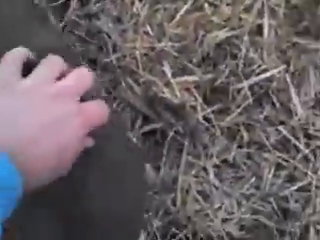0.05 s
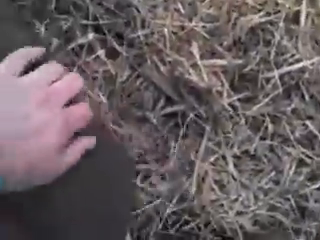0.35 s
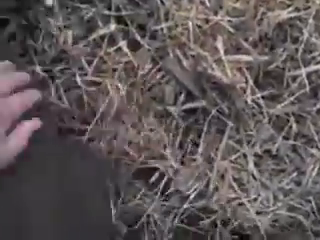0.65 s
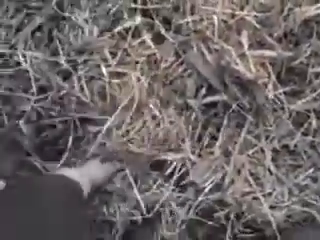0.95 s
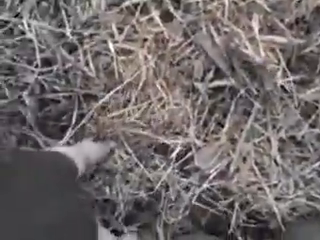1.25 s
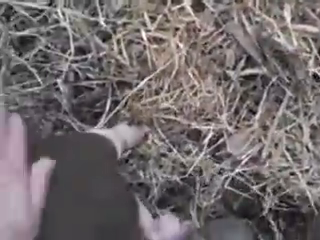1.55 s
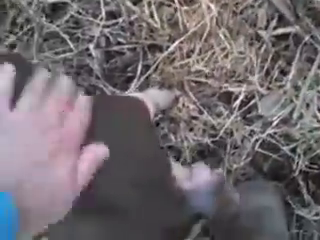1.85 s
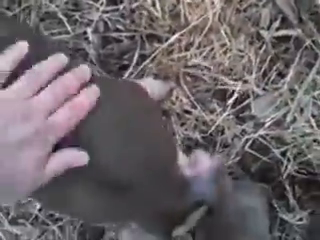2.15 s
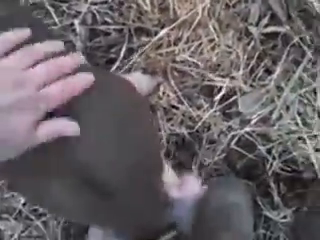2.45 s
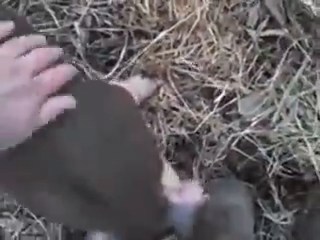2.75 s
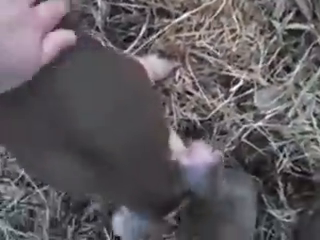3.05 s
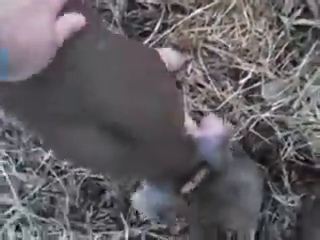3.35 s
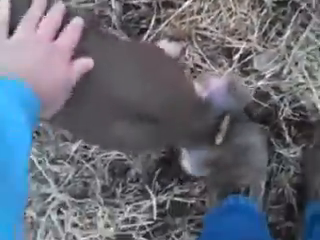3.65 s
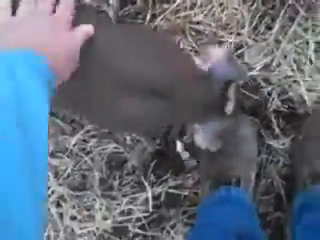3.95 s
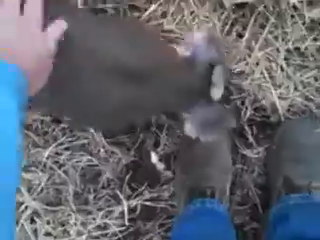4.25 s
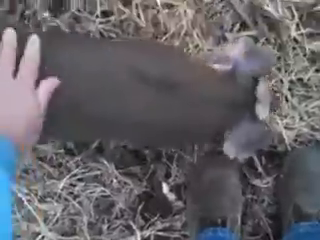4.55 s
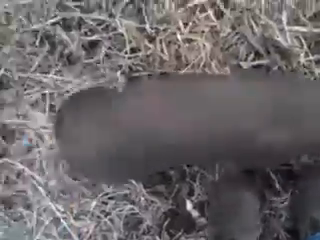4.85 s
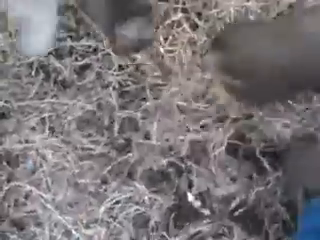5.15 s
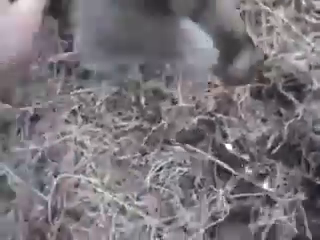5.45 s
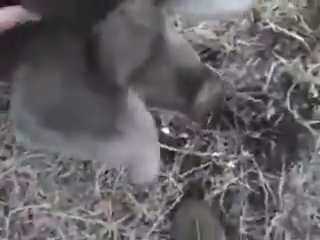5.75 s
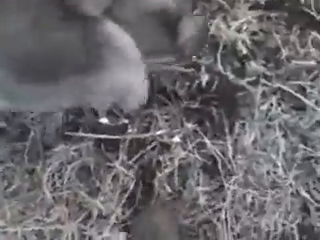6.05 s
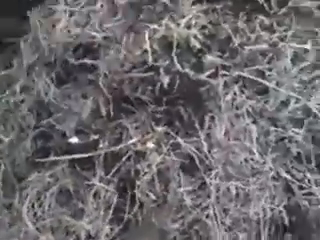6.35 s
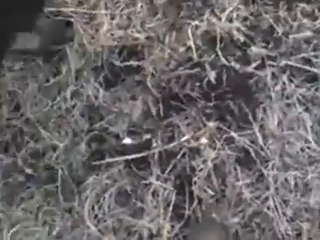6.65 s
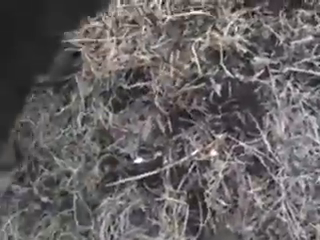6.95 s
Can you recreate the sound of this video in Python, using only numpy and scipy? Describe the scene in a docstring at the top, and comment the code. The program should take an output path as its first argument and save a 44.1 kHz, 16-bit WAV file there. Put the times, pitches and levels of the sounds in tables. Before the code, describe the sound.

A young pig is heard up close outdoors, over a steady hiss and a faint rumble of breeze. Throughout, dry straw rustles and crackles, and a palm drags over bristles with a dull, uneven hiss. Short, low, rattling grunts come at about 0.2, 0.7, 1.1 and 1.5 seconds, with a soft snort and grunt around 2. A louder snort, breaking into separate pops, comes at 3.3 seconds, followed by a grunt and a brief nasal whine. Another loud snort at 4.5 leads into grunts and thin fluttering whines until 5.2. The longest, loudest run of snorts and grunts lasts from 5.8 to 6.5, and a last grunt follows at 6.9. Stalks snap sharply near 1.8, 4.2 and 5.1 seconds. Dull bumps touch the microphone around 2.5, between 3.6 and 4, and at 6.7.

```python
"""Stroking a pig in straw

A young pig stands close to the microphone, outdoors. Slow throat pulses ring its chest and snout in
low rattling grunts, it whines briefly with its mouth shut, and its soft palate slaps open in a few
loud snorts that break into separate pops. A palm drags over bristles while dry stalks rub and snap,
over a steady hiss, a faint rumble of breeze and a few dull bumps on the microphone."""
import sys
import numpy as np
from scipy import signal
from scipy.fft import rfft, irfft, next_fast_len
from scipy.io import wavfile

SR = 44100
rng = np.random.default_rng(int(sys.argv[2]) if len(sys.argv) > 2 else 0)


def transcribe(signal):
    """Save signal, clipped to [-1, 1], as a 16-bit WAV file at the path in sys.argv[1]."""
    frames = np.atleast_2d(signal).T
    limited = np.clip(frames, -1, 1)
    pcm = np.round(limited * 32767).astype(np.int16)
    wavfile.write(sys.argv[1], SR, pcm)


N = 313110
SIDES = np.array([[.5], [-.5]])  # splits a pan or a phase lead between left and right

# Levels in the tables are relative: the layers add their own trims. Positive pan is to the left.
# tone of each noise layer: (frequency [Hz], gain [dB])
BREEZE_EQ = [(20, -52), (45, -29), (70, -5.5), (130, -22), (250, -1), (600, -6), (2000, -58)]
HISS_EQ = [(100, 21), (500, -21), (1200, -3), (2200, -74), (3200, 18), (4500, 1), (8000, -5), (11000, -14),
           (12700, -1), (14000, -13)]
BRISTLE_EQ = [(200, 16.5), (700, 2), (1500, 4.5), (2300, 8.5), (3500, 5.5), (5000, -12.5), (9000, -6)]
STRAW_EQ = [(100, 13), (400, 2.5), (1200, 2), (2200, -0.5), (3200, 5.5), (4500, 7.5), (7000, 8),
            (10000, 6.5), (11500, 9), (12700, 9.5), (14000, -16)]
SNAP_EQ = [(200, -3), (1500, -4), (4000, -2), (9000, -2), (11000, -1), (12500, 2)]
# bleed of each channel into the other: (frequency [Hz], gain [dB])
CROSSFEED_EQ = [(60, -2), (400, -6), (1000, -.5), (2750, 0), (4300, -.4), (5500, -2.5), (8000, -7),
                (12500, -7.5)]
# dull knocks on the microphone: (time [s], level [dB])
MIC_BUMPS = [(2.428, -39), (2.54, -37), (3.09, -58), (3.59, -36), (3.71, -42), (3.98, -32.5), (4.12, -48),
             (6.68, -42)]
# the palm sliding over bristles: (time [s], level [dB])
STROKE_LEVELS = [(0.0, -39.5), (0.57, -41.5), (0.75, -39.5), (1.18, -45), (1.58, -38), (1.8, -49),
                 (2.14, -45.5), (3.28, -42.5), (3.66, -43), (4.15, -42), (4.35, -50), (4.6, -42.5),
                 (5.12, -38), (5.22, -48), (5.85, -51), (6.09, -37), (6.5, -46.5), (6.7, -70)]
# rubs and steps in the straw: (start [s], peak [s], end [s], level [dB])
# with its peak outside its span a rub only builds or only eases; one ending before its start is silent
STRAW_RUBS = [(0, -0.5, 0.09, -38.5), (0.105, -0.5, 0.23, -37.5), (0.261, 0, 0.56, -42),
              (0.433, 0.7, 0.71, -39), (0.606, 2, 0.78, -36), (0.788, 4, 0.9, -37), (0.88, 9, 1.02, -42),
              (1.08, 0.2, 1.33, -40.5), (1.284, -1.5, 1.44, -38), (1.37, 8, 1.72, -42),
              (1.58, -0.4, 1.7, -38.5), (2.02, 1, 2.8, -51.5), (2.448, 4, 2.82, -44.5),
              (2.668, 1, 2.82, -44.5), (2.96, 5, 3.22, -45.5), (3.215, 2, 3.63, -42.5),
              (3.363, 2.5, 3.5, -38.5), (3.443, 2.5, 3.56, -40.5), (3.697, 2, 4.25, -43),
              (3.855, 3.5, 4.15, -40.5), (4.123, 1, 4.24, -37), (4.412, 5, 4.56, -45.5),
              (4.6, 4, 4.83, -42), (4.816, 8.5, 5.1, -42), (5.062, 2, 5.19, -35.5), (5.337, 4, 5.52, -41),
              (5.586, 11, 6.3, -48), (6.032, 6.5, 6.2, -41), (6.204, -2, 6.6, -43.5), (6.553, 5, 7, -44.5),
              (6.67, 7, 6.8, -42.5), (6.83, 8.5, 6.88, -36), (6.975, 6.995, 5.2, -42), (7.071, 6, 7, -47)]
# breaking stalks: (time [s], level [dB], decay [s], ring [Hz])
STALK_SNAPS = [(0.2152, -25, .0012, 12500), (0.229, -22, .0014, 11700), (0.245, -25, .001, 12100),
               (0.623, -27, .002, 6500), (0.654, -22.5, .004, 4200), (0.712, -21.5, .002, 12400),
               (0.761, -21, .0028, 7400), (0.813, -22, .002, 12100), (0.852, -22, .007, 6300),
               (0.9952, -20.5, .001, 12500), (1.363, -27, .0014, 12200), (1.7533, -14.5, .0014, 8100),
               (1.7738, -25, .0009, 11100), (1.8674, -29, .001, 8200), (2.5, -28, .0012, 6700),
               (3.394, -26, .003, 3300), (3.5165, -24.5, .0014, 7800), (3.711, -29, .001, 7000),
               (3.7205, -24.5, .0014, 7000), (4.233, -14.5, .0024, 8300), (4.5583, -20.5, .0018, 3500),
               (5.1377, -11.5, .0012, 12100), (5.407, -24, .0012, 12500), (6.034, -28, .002, 7000),
               (6.298, -27.5, .0014, 7300), (6.388, -20, .0012, 8900), (6.664, -30, .003, 9500),
               (6.6717, -21.5, .0012, 7800), (6.706, -24.5, .0014, 12300), (6.7522, -23.5, .003, 7900),
               (6.823, -25, .0016, 7100), (6.9097, -21, .0016, 12300), (6.9895, -27.5, .003, 11800),
               (7.0007, -24, .0014, 5200), (7.0325, -33, .002, 7300)]
# the pig's resonances, dark to bright; bite and edge are the hard, raspy top of its voice:
# (frequency [Hz], width [Hz], gain [dB], pan [dB], left phase lead [rad])
CHEST_MODES = [(139, 71, 2, 7, 0.067), (222, 94, -1, 0, 0.097)]
NOSE_MODES = [(317, 45, -2, 1, 0.77), (416, 140, 16.5, 6.1, 0.49), (605, 160, 0, 7, 0.32),
              (750, 51, 2.5, 1.8, .1)]
THROAT_MODES = [(1025, 75, 0, 1.5, 0)]
MOUTH_MODES = [(1420, 220, -7, 0, 0.079), (1815, 81, 4.5, -3, 1.33)]
BITE_MODES = [(2430, 170, 1, 0, 2.2), (2730, 140, 0, 0, 3.14)]
EDGE_MODES = [(3370, 175, 12, -2.5, 1.5), (4180, 270, -11, 14, 1)]
# closed-mouth whines: (start [s], length [s], first pitch [Hz], last pitch [Hz], level [dB],
# flutter [0-1])
WHINE_CUES = [(0.04, 0.013, 910, 970, -37.5, 0.2), (0.84, 0.018, 935, 1190, -35, 0.1),
              (0.827, 0.04, 357, 330, -39.5, 0), (1.343, 0.012, 541, 486, -27.5, 0),
              (1.351, 0.025, 443, 387, -35.5, 0), (1.531, 0.016, 467, 511, -31, 0),
              (1.544, 0.019, 525, 538, -28, 0), (1.571, 0.0097, 524, 502, -31, 0),
              (3.577, 0.043, 391, 328, -34.5, 0.1), (3.764, 0.11, 376, 271, -39, 0.12),
              (4.27, 0.026, 293, 320, -39.5, 0.33), (4.481, 0.06, 452, 380, -34, 0.2),
              (4.537, 0.022, 407, 370, -26, 0), (4.559, 0.032, 349, 330, -33.5, 0.1),
              (4.898, 0.043, 348, 357, -34, 0.2), (4.926, 0.14, 391, 316, -37, 0.6),
              (5.068, 0.084, 316, 287, -38.5, 0.3), (5.102, 0.1, 381, 329, -40.5, 0.82),
              (6.438, 0.11, 350.4, 336, -40, 0.46), (6.963, 0.056, 325, 340, -45, 0.36),
              (6.985, 0.13, 335.5, 319, -50, 0.2)]
# grunts: (start [s], peak [s], end [s], nose [dB], chest [dB], mouth [dB], bite [dB], pulse rate [Hz],
# breathiness [0-1], upper mouth modes [dB], nose tuning [ratio], mouth tuning [ratio])
GRUNT_CUES = [(0.15, 0.182, 0.29, -37, -49, -67, -60, 55, 0.5, 8, 0.79, 0.71),
              (0.622, 0.674, 0.784, -36, -32, -42.5, -45, 67, 0.17, -9, 0.94, 1.08),
              (0.746, 0.78, 0.875, -40, -36, -40, -36, 65, 0.3, -6, .95, 1.08),
              (1.058, 1.136, 1.29, -43, -43.5, -42.5, -52, 56, 0.53, -6.5, 0.86, 1.06),
              (1.527, 1.547, 1.625, -46, -34, -48, -60, 49, 0.27, -15, 0.96, 1.02),
              (1.9, 2.02, 2.12, -42, -42, -46, -54, 32, 0.9, -8, 0.97, 0.93),
              (2.091, 2.143, 2.2, -34, -37, -42.5, -65, 80, 0.49, -26, 1.05, 1.13),
              (3.42, 3.514, 3.56, -43, -44, -42.5, -54, 62, 0.6, -9, 1.1, 1.01),
              (4.461, 4.514, 4.575, -31.5, -39, -38, -48, 31.5, 0.9, -4, 1.03, 1.02),
              (4.59, 4.718, 4.78, -35, -53, -41, -47, 82, 0.74, -11, 1.016, 0.95),
              (4.745, 4.773, 4.845, -33, -36.5, -39.5, -55, 74, 0.73, -15, 0.99, 0.94),
              (4.93, 5.007, 5.065, -43.5, -42, -59, -60, 58, 0.1, -5, 0.81, 1),
              (5.786, 5.827, 5.98, -36, -42, -39.5, -49, 33, 0.7, -3, 1.11, 1.02),
              (5.96, 6.057, 6.1, -38.5, -49, -44, -50, 36, 0.98, -1, 1.15, 1.1),
              (6.055, 6.118, 6.186, -38, -41, -27.5, -33.5, 52.4, 0.3, 2.5, 1.1, 1.02),
              (6.19, 6.28, 6.33, -35.5, -56, -45.5, -60, 60, 0.7, -19, 0.75, 0.82),
              (6.37, 6.46, 6.56, -41.5, -39, -48, -62, 57, 0.42, -17, 0.98, 0.89),
              (6.86, 6.9, 6.955, -34.5, -32.5, -42, -67, 76, 0.54, -10, 0.99, 1.01)]
# pops of the snorts: (time [s], level [dB], mouth over nose [dB], rasp [dB], mouth tuning [Hz])
SNORT_POPS = [(0.110, -39, -11, -18, 1840), (0.314, -50, -19, -6, 1900), (0.336, -43.5, -5, -3, 1960),
              (0.532, -39, -3, -15, 1880), (0.639, -41.5, 7, 0, 2010), (0.654, -43, 6, 6, 2000),
              (0.669, -37.5, -9, -3, 2000), (1.574, -48, -24, 0, 1850), (1.597, -44, -17, -4, 1870),
              (1.957, -43.5, -5, 5.5, 1840), (1.9897, -40.5, -8, 2.5, 1740), (2.025, -47.5, -8, 8, 1800),
              (2.058, -45, -1.5, 6.5, 1700), (2.091, -47.5, -1, 3, 1700), (3.284, -42, 5, -7, 1780),
              (3.31, -28.5, 10.5, 5, 1755), (3.345, -30.5, 8.5, -1.5, 1683), (3.38, -35.5, 3.5, -2, 1730),
              (3.393, -45.5, -9, 10, 1730), (4.439, -34.5, 6.5, -4.5, 1794), (4.464, -29.5, 4, -17, 1800),
              (4.494, -27.5, -1, -7.5, 1794), (4.526, -28.5, -4, -2.5, 1674), (4.558, -27.5, -4.5, 3, 1644),
              (5.787, -33.5, -5, -7, 1780), (5.812, -27.5, -4, -13, 1800), (5.85, -25.5, -7, -5, 1550),
              (5.879, -25, -0.5, 4.5, 1590), (5.907, -29.5, -8, -4.5, 1610), (5.932, -42, -12, -7, 1620),
              (5.954, -41, -15, -13, 1580), (5.981, -30, -2.5, 0.5, 1770), (6.0065, -31.5, -8, -6, 1696),
              (6.029, -37, -2, -2, 1630), (6.035, -30, -3.5, -0.5, 1770), (6.056, -35, 3, -14, 1720),
              (6.312, -38.5, -5, 0, 1640), (6.325, -29.5, -4, -3, 1680), (6.342, -38, -1, -1, 1730),
              (6.3479, -25, 0, -5.5, 1750), (6.372, -45.5, -19, 0, 1700)]
MOUTH_REST_HZ = 1740  # the mouth tuning that leaves MOUTH_MODES at their own pitch
# set of the head from snort to snort: (time [s], edge tuning [ratio], chest thump [dB],
# throat over mouth [dB], flat start of the mouth [share], bite [dB], time until the mouth shuts [s])
SNORT_POSTURE = [(0.53, 1.2, -26.5, -13, .05, -20, .012), (0.64, 1.12, -52, -11, .05, 0, 0.02),
                 (2.0, 1.02, -35.5, 2.5, 0.059, -18, 0.026), (3.31, 0.95, -26.5, -0.5, 0.031, -6, 0.013),
                 (3.385, 1.04, -30, -3.5, 0.049, -15, 0.0099), (4.463, 0.97, -34, -12, .03, -4, 0.017),
                 (4.494, 1.04, -31, -7, 0.17, -17, 0.023), (4.56, 1.04, -28, -16, 0.2, -10, 0.0085),
                 (5.82, 1.006, -33.5, -1, 0.047, -14, 0.015), (6.03, 1.044, -34.5, -1, 0.041, -27, 0.011),
                 (6.34, 1.01, -32.5, -2.5, .04, -13, 0.017)]
# where the pig's head is: (time [s], pan [dB])
HEAD_PAN = [(0.2, 0), (0.65, 1.5), (1.5, 4), (2.0, 1), (3.3, 0), (4.5, -1.5), (6.0, -1), (6.9, -2)]


def from_db(db):
    """Decibels to gain."""
    return 10 ** (np.asarray(db) / 20)


def unit_rms(x):
    """Scale to unit power."""
    return x / np.sqrt(np.mean(x ** 2) + 1e-20)


def curves_at(rows, t):
    """Read each column of an automation table at the times t."""
    times, *columns = np.transpose(rows)
    return [np.interp(t, times, column) for column in columns]


def add(out, start_s, sound):
    """Mix a sound in at its cue."""
    i = max(int(start_s * SR), 0)
    out[:, i:i + sound.shape[-1]] += sound[..., :max(N - i, 0)]


def equalise(x, eq, delay_s=0):
    """Filter by a smooth EQ curve, with an optional delay."""
    size = next_fast_len(x.shape[-1] + 2048)
    f = np.arange(size // 2 + 1) * SR / size
    hz, db = np.transpose(eq)
    gain = from_db(np.interp(np.log(f + 1), np.log(hz), db))
    delay = np.exp(-2j * np.pi * f * delay_s)
    return irfft(rfft(x, size) * gain * delay, size)[..., :x.shape[-1]]


def drift(rate_hz, t):
    """Smooth random modulation with a spread near 1."""
    knots = rng.standard_normal(2048)
    return np.interp((t - t[0]) * rate_hz, np.arange(2048), knots)


def swell(t, start, peak, end, build_db, sink_db, curve, onset_s, stop_s):
    """Envelope of one effort: it fades in, builds towards its peak, sinks past it and stops."""
    before = np.clip((peak - t) / max(peak - start, 1e-3), 0, 1)
    after = np.clip((t - peak) / max(end - peak, 1e-3), 0, 1)
    fades = np.clip(np.minimum((t - start) / onset_s + 1, (end - t) / stop_s), 0, 1)
    return fades * from_db(-build_db * before ** curve - sink_db * after ** curve)


def ring(drive, hz, width_hz):
    """One damped resonance, as a complex signal."""
    r = np.exp(-np.pi * width_hz / SR)
    return signal.lfilter([1 - r], [1, -r * np.exp(2j * np.pi * hz / SR)], drive)


def resonate(drive, modes, tuning=1, skirt=6):
    """Stereo ringing of a group of modes; a wider second pole keeps the valleys dark."""
    out = 0
    for k, (hz, width_hz, db, pan_db, lead) in enumerate(modes):
        narrow = ring(drive, hz * tuning, width_hz)
        mode = ring(narrow, hz * tuning, width_hz * skirt)
        out = out + (-1) ** k * from_db(db + pan_db * SIDES) * np.real(mode * np.exp(1j * lead * SIDES))
    return out


def glide(sound, sag, rise_s):
    """Start a sound flat by the share sag and slide it up to pitch."""
    t = np.arange(sound.shape[-1]) / SR
    read_at = t - sag * rise_s * (1 - np.exp(-t / rise_s))
    return np.array([np.interp(read_at, t, side) for side in sound])


def wander(sound, t, spread_s=0.0003):
    """Play a sound now early, now late, so its pulses and resonances waver."""
    read_at = t + spread_s * drift(90, t)
    return np.array([np.interp(read_at, t, side) for side in sound])


def widen(x, comb_spacing_hz=2770):
    """Late, inverted crossfeed swings the sides in and out of phase along the spectrum."""
    hz, db = np.transpose(CROSSFEED_EQ)
    even_power_eq = np.column_stack([hz, -10 * np.log10(1 + from_db(db) ** 2)])
    bleed = equalise(x[::-1], CROSSFEED_EQ, delay_s=1 / comb_spacing_hz)
    return equalise(x - bleed, even_power_eq)


def noise_bed(eq):
    """Steady stereo noise of unit power, shaped by an EQ curve."""
    return unit_rms(equalise(rng.standard_normal((2, N)), eq))


def breeze(t, pig, level_db=-58.5, gust_db=5.0, rush_db=-11.5, rush_s=0.011, rush_top_hz=75.4):
    """Moving air rumbles on the microphone; each call of the pig adds a deep rush that dies away."""
    r = np.exp(-1 / (rush_s * SR))
    call_envelope = np.sqrt(signal.lfilter([1 - r], [1, -r], np.mean(pig ** 2, axis=0) + 1e-18))
    air = noise_bed(BREEZE_EQ)
    rush = unit_rms(signal.sosfilt(signal.butter(2, rush_top_hz, fs=SR, output="sos"), air))
    return from_db(level_db + gust_db * drift(14, t)) * air + from_db(rush_db) * call_envelope * rush


def mic_bumps(pitch_hz=65, swell_s=0.017):
    """Each bump sways the microphone for a few cycles, the two sides in opposition."""
    out, t = np.zeros((2, N)), np.arange(int(SR / 8)) / SR
    envelope = t / swell_s * np.exp(1 - t / swell_s)
    for start, db in MIC_BUMPS:
        sway = np.sin(2 * np.pi * pitch_hz * np.cumsum(1 + 0.093 * drift(60, t)) / SR)
        add(out, start, from_db(db) * sway * envelope * np.array([[1], [-.6]]))
    return out


def near_echo(x, decay_s=0.043, gap_s=0.0022):
    """Ground, legs and flank throw back a brief diffuse echo."""
    t = np.arange(int(SR / 10)) / SR
    echo = rng.standard_normal((2, len(t))) * np.exp(-t / decay_s) * (t > gap_s)
    return signal.fftconvolve(x, unit_rms(echo) / np.sqrt(len(t)), axes=1)[:, :N]


def palm_stroke(t, flicker_db=3.0):
    """The palm drags over bristles with a dull, uneven hiss."""
    level_db = curves_at(STROKE_LEVELS, t)[0] + flicker_db * drift(60, t)
    return from_db(level_db) * noise_bed(BRISTLE_EQ)


def rub_effort(stir_db=-49.5, stop_s=0.025):
    """How hard the straw is rubbed: the strongest rub of the moment over a constant stir."""
    t = np.arange(0, N, 32) / SR
    rubs = [from_db(db) * swell(t, start, peak, end + stop_s, build_db=2, sink_db=5, curve=3.2,
                                onset_s=0.017, stop_s=stop_s)
            for start, peak, end, db in STRAW_RUBS]
    effort = np.hypot(np.max(rubs, axis=0), from_db(stir_db))
    return np.interp(np.arange(N) / SR, t, effort)


def straw_rustle(t, grains_per_s=1100, grain_db=-7, flicker_db=1.34, patchy_db=3.0, trim_db=4.5):
    """Stalks rub as a fine hiss full of tiny cracks; each range of stalk sizes swells on its own."""
    effort = rub_effort() * from_db(trim_db + flicker_db * drift(90, t))
    sizes = from_db(2.8 * np.minimum(rng.exponential(1, N), 3)) * rng.standard_normal((2, N))
    friction = rng.standard_normal((2, N))
    grains = unit_rms(sizes * (rng.random(N) < grains_per_s / SR))
    spectrum = rfft(friction + from_db(grain_db) * grains)
    octave = np.log2(np.fft.rfftfreq(N, 1 / SR) + 1)
    centres = np.log2([1000, 2000, 3300, 4600, 6800, 9500, 12500])
    bands = [irfft(spectrum * np.interp(octave, centres, band), N) for band in np.eye(len(centres))]
    patches = sum(band * from_db(patchy_db * drift(30, t)) for band in bands)
    return effort * unit_rms(equalise(patches, STRAW_EQ))


def stalk_ring(splinters, hz, q):
    """A stalk rings for a few cycles at its own pitch."""
    return 2 * np.real(ring(splinters, hz, hz / q))


def straw_crackles(per_s=16, trim_db=3.5, spread_db=2.5, splinter_s=0.001, range_hz=(3300, 12500)):
    """Thin stalks give way at random under the rubbing, each with a brief ring of its own."""
    out, t = np.zeros((2, N)), np.arange(512) / SR
    effort, stalks = rub_effort(), 400
    for when, pitch, size, chance in rng.random((stalks, 4)):
        hz = np.exp(np.interp(pitch, [0, 1], np.log(range_hz)))
        splinters = rng.standard_normal((2, len(t))) * np.exp(-t / splinter_s)
        tick = stalk_ring(splinters, hz, q=7.0)
        if chance < per_s * N / SR / stalks:
            peak = 2 * effort[int(when * N)] * from_db(trim_db + spread_db * size)
            add(out, when * N / SR, peak * tick / np.abs(tick).max())
    return out


def straw_snaps(bend_s=0.011, bend_db=-17, ring_db=2):
    """A dry stalk splinters more and more as it bends, then breaks with a sharp, ringing crack."""
    out, t = np.zeros((2, N)), np.arange(-1024, 1024) / SR
    for break_s, db, decay_s, hz in STALK_SNAPS:
        force = np.where(t < 0, from_db(bend_db) * np.exp(-abs(t) / bend_s), np.exp(-abs(t) / decay_s))
        splinters = force * rng.standard_normal((2, len(t)))
        crack = splinters + from_db(ring_db) * stalk_ring(splinters, hz, q=5.7)
        add(out, break_s + t[0], from_db(db) * crack / np.sqrt(2))
    return equalise(out, SNAP_EQ)


def whines(flutter_hz=57.4, waver=0.081, second_db=-25, third_db=-22, pan_db=7.0, lead_rad=0.055):
    """Hoarse nasal tones that glide, and flutter when the throat rattles along."""
    out = np.zeros((2, N))
    for start, length, first_hz, last_hz, db, flutter in WHINE_CUES:
        t = np.arange(0, length, 1 / SR)
        pitch = np.linspace(first_hz, last_hz, len(t)) * (1 + waver * drift(140, t))
        phase = 2 * np.pi * np.cumsum(pitch) / SR + lead_rad * SIDES
        overtones = from_db(second_db) * np.sin(2 * phase) + from_db(third_db) * np.sin(3 * phase)
        rattle = 1 + flutter * np.cos(2 * np.pi * flutter_hz * t + 0.44 * drift(13, t))
        hoarseness = 1 + .42 * drift(330, t)
        envelope = np.sqrt(2) * from_db(db + pan_db * SIDES) * signal.windows.tukey(len(t), .6)
        add(out, start, envelope * (np.sin(phase) + overtones) * rattle * hoarseness)
    return out


def grunts(air=0.14, air_width=0.096, shimmer_db=1.8, mouth_db=-3, bite_db=-3):
    """Slow throat pulses, each with a puff of air, strike chest, nose and mouth under one swell."""
    out = np.zeros((2, N))
    for (start, peak, end, nose, chest, mouth, bite,
         rate_hz, breathy, upper_db, nose_tuning, mouth_tuning) in GRUNT_CUES:
        t = np.arange(start, end, 1 / SR)
        effort = swell(t, start, peak, end, build_db=9.5, sink_db=11.5, curve=1.94,
                       onset_s=0.0036, stop_s=0.0087)
        cycle = np.cumsum(rate_hz * (1 + .009 * drift(40, t))) / SR
        pulses = (1 - breathy) * np.diff(np.floor(cycle), prepend=-1)
        puffs = air * breathy * np.exp(-1.8 * (cycle % 1))
        drives = []
        for _ in range(3):
            shimmer = from_db(shimmer_db * drift(rate_hz, t))  # a slack throat never closes twice alike
            breath = rng.standard_normal(len(t)) + air_width * rng.standard_normal((2, len(t)))
            drives.append(pulses * shimmer + puffs * breath)
        low, nasal, oral = drives
        throat = resonate(oral, THROAT_MODES, mouth_tuning, skirt=9.7)
        upper_mouth = from_db(upper_db) * resonate(oral, MOUTH_MODES, mouth_tuning, skirt=14.0)
        paths = [(wander(resonate(low, CHEST_MODES), t), chest),
                 (wander(resonate(nasal, NOSE_MODES, nose_tuning), t), nose),
                 (throat + upper_mouth, mouth + mouth_db),
                 (resonate(oral, BITE_MODES), bite + bite_db)]
        add(out, start, effort * sum(from_db(db) * unit_rms(path) for path, db in paths))
    return out


def palate_leaks(trim_db=-12, mouth_db=-9, build_s=0.00396):
    """Just before each pop, air forces its way past the palate in a quickly growing nasal rasp."""
    out, t = np.zeros((2, N)), np.arange(-int(SR / 40), 0) / SR
    for pop_s, db, *_ in SNORT_POPS:
        air = np.pad(np.exp(t / build_s) * rng.standard_normal(len(t)), (0, len(t)))
        nasal = unit_rms(resonate(air, NOSE_MODES))
        oral = from_db(mouth_db) * unit_rms(resonate(air, THROAT_MODES + MOUTH_MODES))
        add(out, pop_s + t[0] - build_s / 2, from_db(db + trim_db) * (nasal + oral))
    return out


def snorts(chest_db=-6, nose_db=-8, throat_db=-7.5, mouth_db=-6, edge_db=-8, full_pop_db=-28,
           puff_s=0.002, trail_s=0.014, snout_early_s=0.00043, chest_early_s=0.0026):
    """The soft palate slaps open and air rings the snout, rising as it opens and choked as it shuts."""
    out, t = np.zeros((2, N)), np.arange(int(SR / 16)) / SR
    slap = signal.unit_impulse(len(t))
    flow = 0.28 * t / puff_s * np.exp(-t / puff_s) + 0.022 * np.exp(-t / trail_s)
    for pop_s, level, opening, rasp, mouth_hz in SNORT_POPS:
        edge_tuning, thump, throat, sag, bite, shut_s = curves_at(SNORT_POSTURE, pop_s)
        air = flow * rng.standard_normal(len(t))
        thud, smack = slap + 0.48 * air, slap + 0.41 * air
        nose_tuning = 1.074 + 0.017 * rng.standard_normal()  # the snout is never set twice alike
        shutting = 1 / (1 + (t / shut_s) ** 6)
        nasal, oral = level - opening / 2, level + opening / 2  # an open mouth takes air from the nose
        paths = [(NOSE_MODES, nasal + nose_db, nose_tuning, 0, thud),
                 (THROAT_MODES, oral + throat + throat_db, 1, 0, thud),
                 (MOUTH_MODES, oral + mouth_db, mouth_hz / MOUTH_REST_HZ, sag, smack),
                 (BITE_MODES, level + bite, 1, 0, air),
                 (EDGE_MODES, level + rasp + edge_db, edge_tuning, sag / 2, air)]
        for modes, db, tuning, flat, drive in paths:
            ringing = glide(resonate(drive, modes, tuning, skirt=2.95), flat, rise_s=.005)
            add(out, pop_s - snout_early_s, from_db(db) * unit_rms(shutting * ringing))
        # the chest follows the strength of the pop less than the snout does
        chest_gain = from_db(thump + 0.44 * (level - full_pop_db) + chest_db)
        add(out, pop_s - chest_early_s, chest_gain * unit_rms(resonate(thud, CHEST_MODES, skirt=5.1)))
    return out


def pig_voice(t, low_cut_hz=95, nasal_dip_hz=2200, nasal_dip_q=7):
    """All the calls, panned with the head; the nasal passages swallow one narrow band."""
    low_cut = signal.butter(2, low_cut_hz, "high", fs=SR, output="sos")
    calls = signal.sosfilt(low_cut, snorts() + palate_leaks() + grunts()) + whines()
    voice = signal.lfilter(*signal.iirnotch(nasal_dip_hz, nasal_dip_q, fs=SR), calls)
    return voice * from_db(curves_at(HEAD_PAN, t)[0] * SIDES)


def scene(hiss_db=-48, bed_pan_db=-1.1, echo_db=-14):
    """The pig up close, turning its head, in a wide bed of straw, hiss and breeze."""
    t = np.arange(N) / SR
    pig = pig_voice(t)
    hiss = from_db(hiss_db) * noise_bed(HISS_EQ)
    foley = straw_rustle(t) + palm_stroke(t) + straw_snaps() + straw_crackles()
    bed = hiss + breeze(t, pig) + foley + from_db(echo_db) * near_echo(pig)
    return widen(bed * from_db(bed_pan_db * SIDES)) + mic_bumps() + pig


def record(dry, low_cut_hz=36, high_cut_hz=13200):
    """The deepest bass is rolled off and the top is cut steeply."""
    thinned = signal.sosfilt(signal.butter(2, low_cut_hz, "high", fs=SR, output="sos"), dry)
    return signal.sosfilt(signal.ellip(12, .2, 80, high_cut_hz, fs=SR, output="sos"), thinned)


dry = scene()
out = record(dry)
transcribe(out)
```